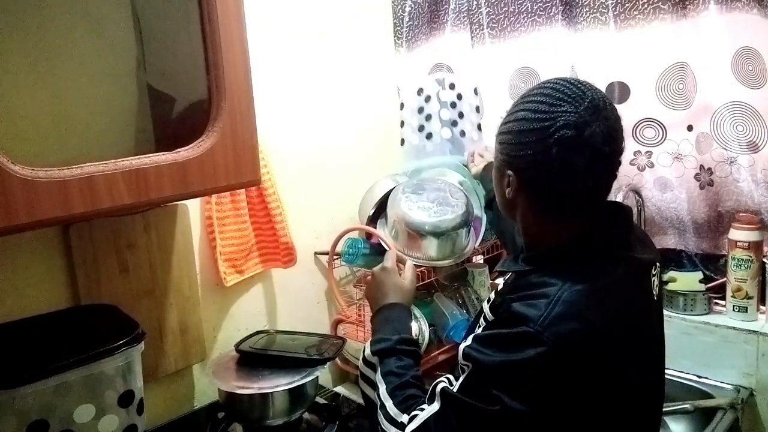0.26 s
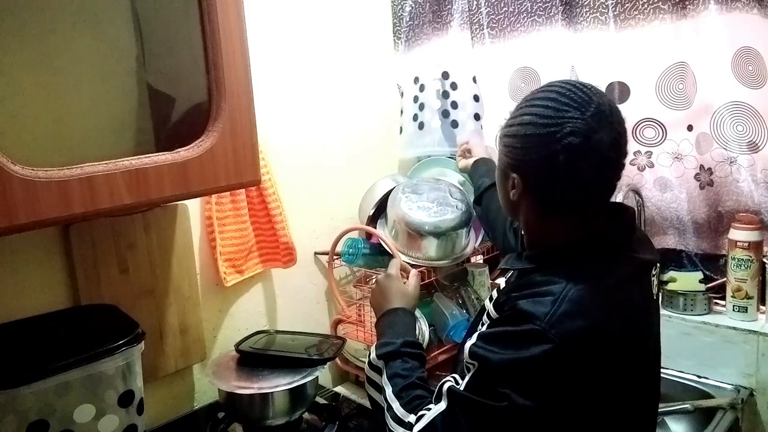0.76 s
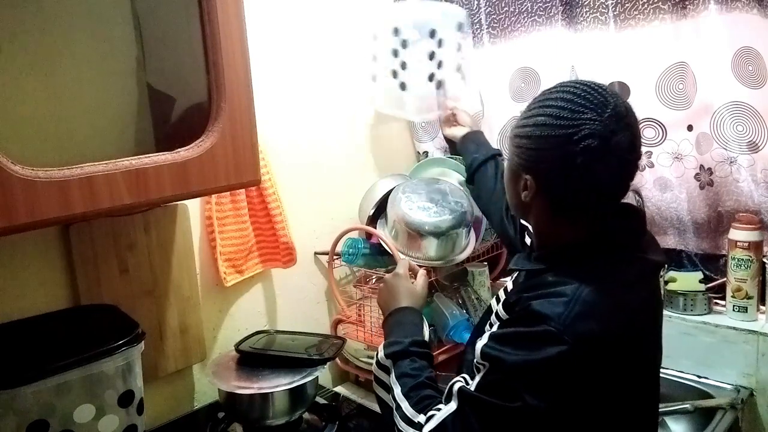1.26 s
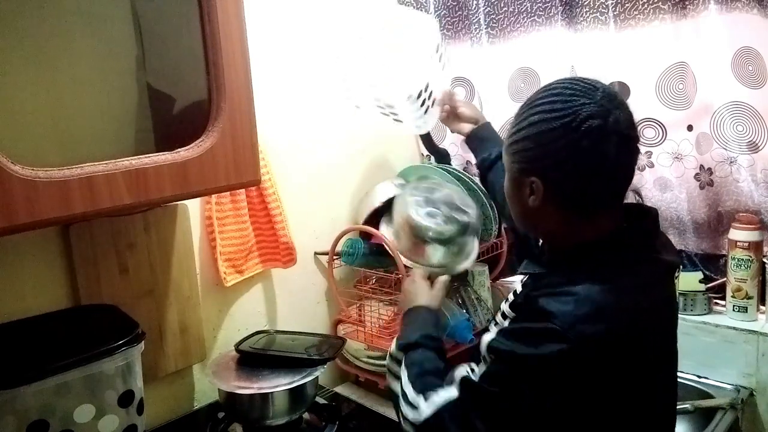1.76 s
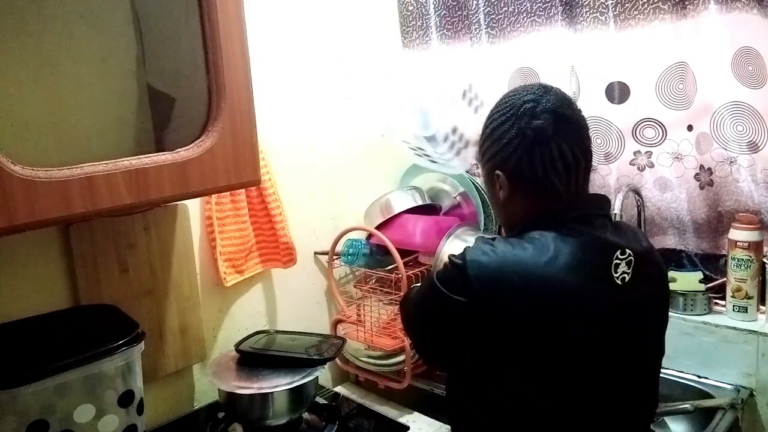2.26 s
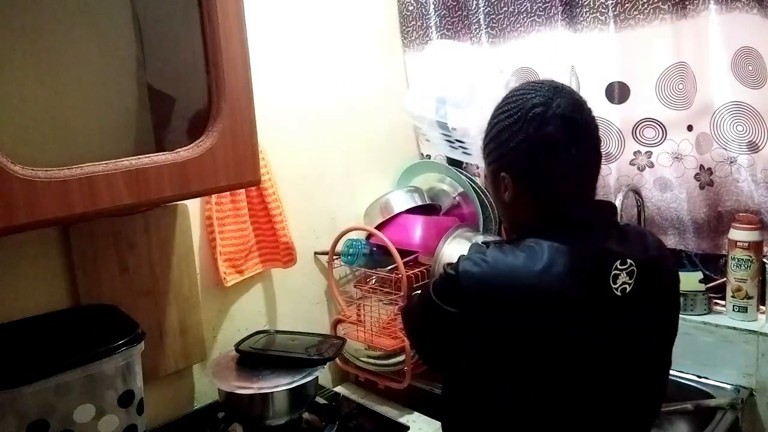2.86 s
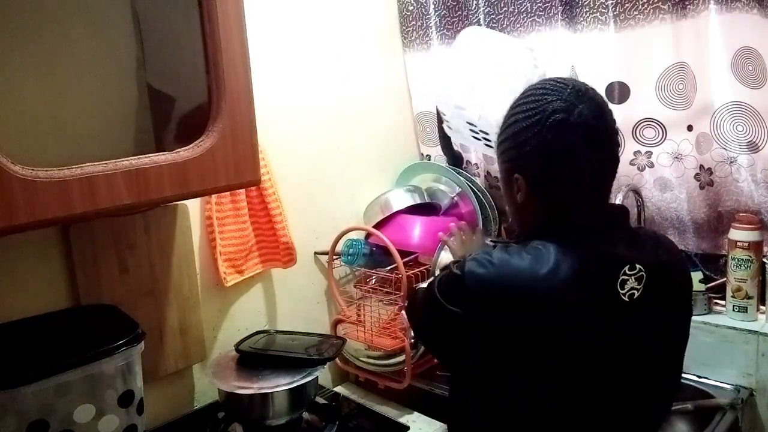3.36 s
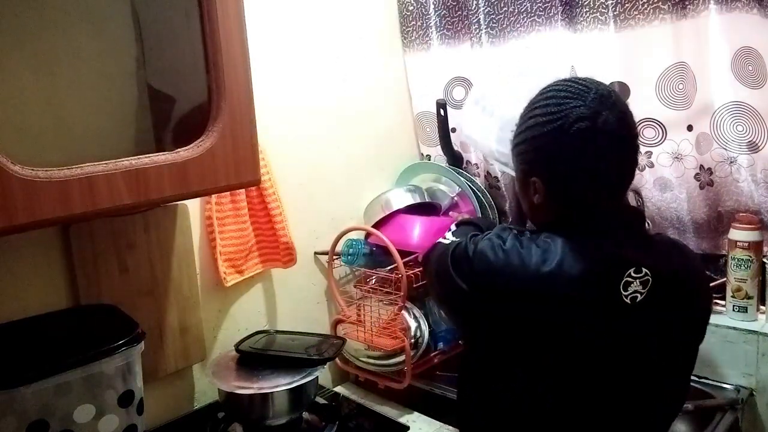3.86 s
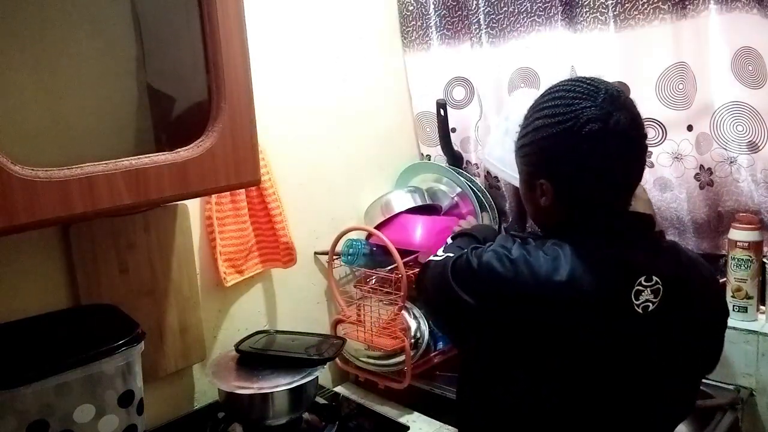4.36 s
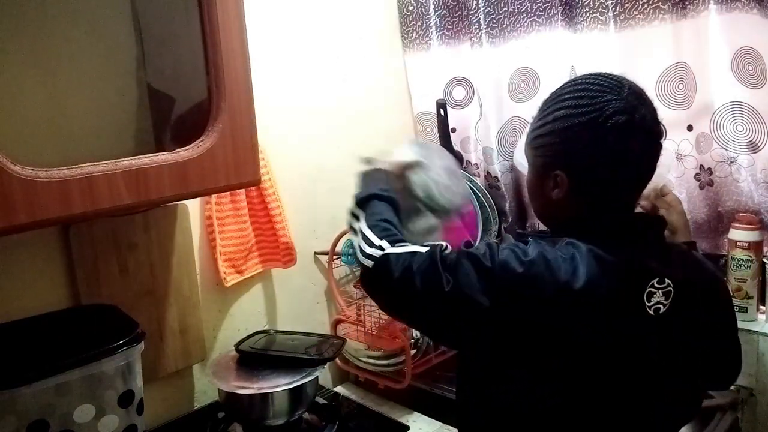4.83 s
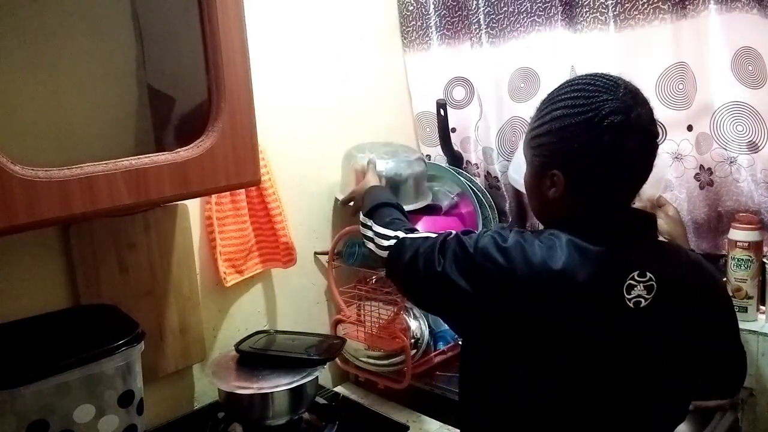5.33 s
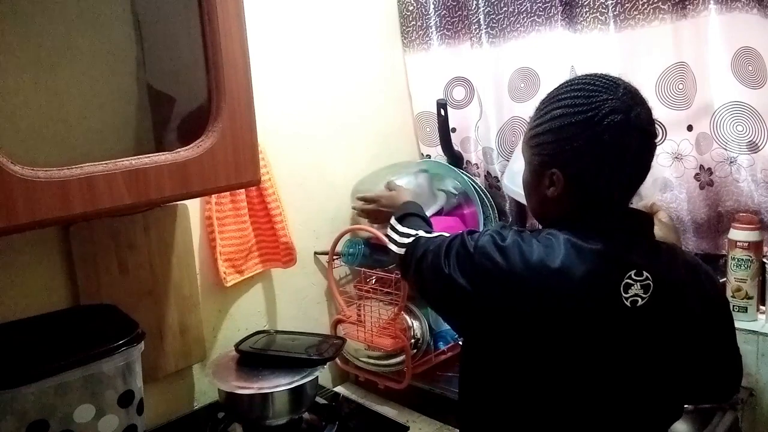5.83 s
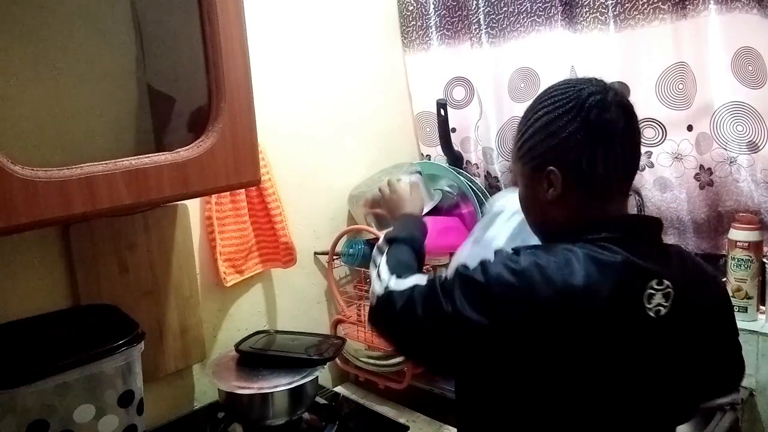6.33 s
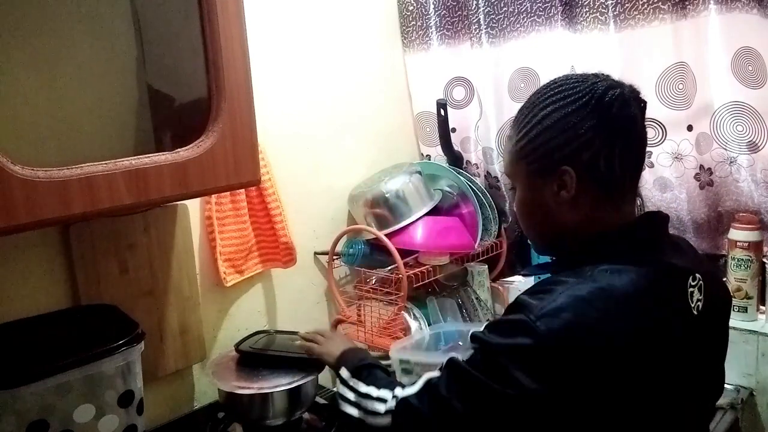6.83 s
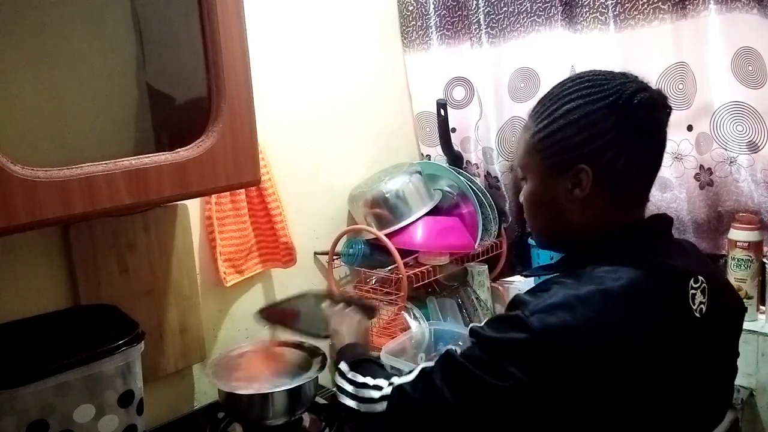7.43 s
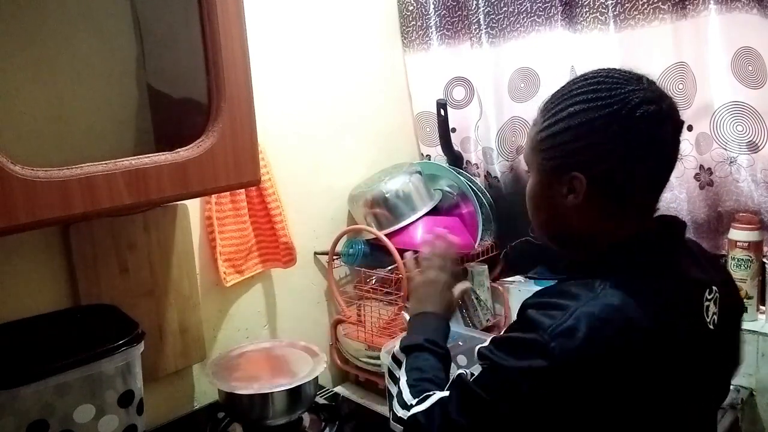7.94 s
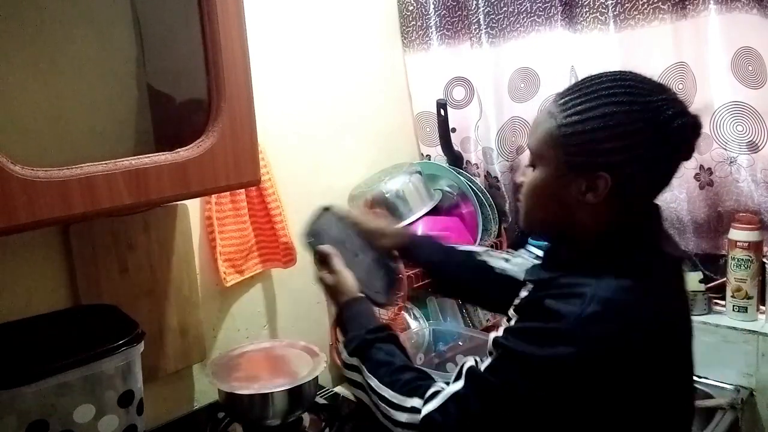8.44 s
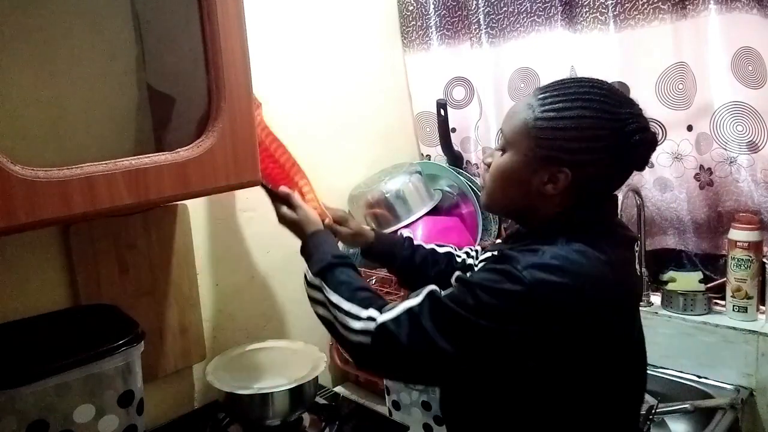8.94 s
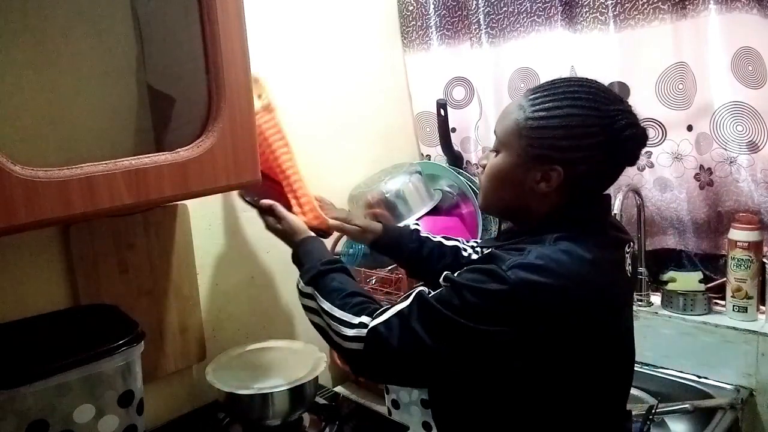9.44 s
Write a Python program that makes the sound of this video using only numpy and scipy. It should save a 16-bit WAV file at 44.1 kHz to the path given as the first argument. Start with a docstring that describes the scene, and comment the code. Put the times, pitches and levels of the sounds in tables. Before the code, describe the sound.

A plain handheld-type pickup, right side only with treble slightly dulled, catches dishes moved in a small, short-echo room. Quiet plastic bumps lead to a rattling burst from a small metal bowl, softer taps, then a large bowl's single clang and a denser clanging run that rings briefly. A plastic dish snaps down with low rack thuds, and it fades to hush and faint rustling.

```python
"""Bowls and dishes shifted and stacked in a wire rack in a small kitchen; right channel only, left silent.
Soft plastic knocks and drags up to 1.1 s; small steel bowl 1.3-3.2 s; large steel bowl 4.1-6.1 s,
ringing on; plastic again 6.4-8.0 s; then faint rustles and a drag over the hush.
Blow: filtered-noise clack, resonant knock, rack thud and decaying modes. Drag: friction noise and
noise-driven modes."""
import sys
import numpy as np
from scipy import signal
from scipy.fft import rfft, irfft
from scipy.io import wavfile
from scipy.ndimage import uniform_filter1d

SR = 44100
rng = np.random.default_rng(int(sys.argv[2]) if len(sys.argv) > 2 else 0)


def to_wav(sig):
    """Store sig (one row per channel, or 1-D mono) as 16-bit WAV at the path in sys.argv[1].

    Samples outside -1..1 are clipped; the rate is SR.
    """
    pcm = np.clip(np.atleast_2d(sig), -1, 1) * 32767
    pcm = np.round(pcm).astype(np.int16)
    wavfile.write(sys.argv[1], SR, pcm.T)  # frames by channels


N = 427632  # samples, 9.7 s

# All table levels are relative: stages downstream add gain.


def amp(db):
    """Amplitude factor of a level in dB."""
    return np.exp(np.asarray(db) * (np.log(10) / 20))


def evened(x):
    """Scales x to rms 1."""
    return x / np.sqrt(np.mean(x ** 2) + 1e-20)


def read(points, hz):
    """Interpolates (f/Hz, value) points over log frequency."""
    f, value = np.transpose(points)
    return np.interp(np.log(hz + 1), np.log(f + 1), value)


def add(mix, start_s, sound):
    """Adds sound into mix at start_s, cut at the end of mix."""
    part = mix[round(start_s * SR):][:len(sound)]
    part += sound[:len(part)]


def slow_noise(count, size):
    """Noise smoothed over size samples; rms 1."""
    return evened(uniform_filter1d(rng.standard_normal(count), size))


def swell(t, rise_s, t60_s):
    """Rounded rise, hold to 2.9 rise_s, then a fall of 60 dB in t60_s."""
    fall_db = -60 * np.maximum(t - 2.9 * rise_s, 0) / t60_s
    return np.sin(np.pi / 2 * np.minimum(t / rise_s, 1)) * amp(fall_db)


def hump(x, centre_hz, share):
    """Passes x through a steep resonance whose width is a share of its pitch; rms 1."""
    hz = np.fft.rfftfreq(len(x), 1 / SR)
    offset = (hz - centre_hz) / (share * centre_hz)
    return evened(irfft(rfft(x) / (1 + offset ** 2) ** 2, len(x)))


def ringing(modes, t):
    """Impulse response of a set of decaying modes; peak 1."""
    hz, db, t60_s = np.transpose(modes)[:, :, None]
    tones = (amp(db - 60 * t / t60_s) * np.sin(2 * np.pi * hz * t)).sum(0)
    return tones / abs(tones).max()


def shaken(modes, lumpy_db, size):
    """Modes driven by noise that comes in uneven pushes; rms 1."""
    pushes = rng.standard_normal(N) * amp(lumpy_db * slow_noise(N, size))
    return evened(signal.oaconvolve(pushes, ringing(modes, np.arange(12000) / SR))[:N])


def patchy(spectrum, size, patchy_db, frames_wide, bins_wide):
    """Noise whose short-time spectrum has drifting loud and soft patches; rms 1."""
    hz = np.fft.rfftfreq(size, 1 / SR)
    real, imag, patches = rng.standard_normal((4 * N // size + 5, len(hz), 3)).T
    patches = uniform_filter1d(uniform_filter1d(patches, bins_wide, 0), frames_wide, 1)
    level_db = read(spectrum, hz)[:, None] + patchy_db * evened(patches)
    z = (real + 1j * imag) * amp(level_db)
    return evened(signal.istft(z, nperseg=size, noverlap=3 * size // 4)[1][:N])


# Background spectrum: [f/Hz, density/dB per Hz]
HUSH_SPECTRUM = [(18, -36.5), (30, -9), (75, 9), (142, -16), (205, -0.5), (356, -20.5), (1400, -23),
                 (1520, -25.5), (5960, -24), (8180, -33), (13500, -32), (15000, -29.5), (16200, -30)]


def hush():
    """Steady background noise with drifting spectral patches."""
    return amp(-62) * patchy(HUSH_SPECTRUM, size=1024, patchy_db=4.5, frames_wide=10, bins_wide=4)


# Level of the low hum: [t/s, level/dB]
HUM_LEVEL = [(0, -50), (.25, -59.5), (2.7, -59), (3.701, -67.5), (4.601, -68), (5.3, -60.5), (6.5, -68),
             (8.15, -65), (8.4, -77.5), (9.7, -76)]
# Wire rack, first two modes the counter: [f/Hz, level/dB, t60/s]
RACK_MODES = [(72, -6, .5), (88, -6, .5), (133, -2, .35), (203, -1, .24), (241, -2, .28), (300, -5, .14),
              (375, -3, .15), (430, -4, .14)]


def rack_hum():
    """One rack mode, driven by uneven noise, hums faintly on and off."""
    level_db = np.interp(np.arange(N) / SR, *np.transpose(HUM_LEVEL))
    return amp(level_db) * shaken(RACK_MODES[4:5], lumpy_db=5.0, size=4000)


# Reverberation: [f/Hz, t60/s]
KITCHEN_T60 = [(100, 0.45), (500, .35), (1500, 0.2), (4000, 0.22), (10000, 0.16)]


def kitchen(x):
    """Sparse taps of random sign, each band dying at its own speed."""
    taps = np.zeros(SR // 2)
    at = np.arange(200, len(taps) - 20, 20)
    taps[at + rng.integers(0, 20, len(at))] = rng.choice([-1., 1.], len(at))
    hz, t, z = signal.stft(taps, SR, nperseg=256)
    fall_db = -60 * t / read(KITCHEN_T60, hz)[:, None]
    tail = signal.istft(z * amp(fall_db), SR, nperseg=256)[1]
    return signal.oaconvolve(x, tail / np.linalg.norm(tail))[:N]


# Single rubs of a finger or rim: [t/s, f/Hz, level/dB, length/s]
RUB_EVENTS = [(0.214, 996, -57, 0.18), (1.874, 5600, -28.5, .11), (2.01, 5270, -23, 0.044),
              (7.319, 1308, -50.5, 0.1), (4.139, 5200, -51, 0.18), (4.402, 4800, -44, 0.059),
              (3.431, 680, -63, 0.075), (3.558, 680, -56, 0.037), (4.86, 1900, -61.5, 0.075)]
# Faint rustles of handled dishes: [t/s, level/dB, length/s]
RUSTLE_EVENTS = [(3.389, -67.5, .07), (3.548, -66, .067), (3.617, -70.5, .08), (4.55, -67.5, .14),
                 (4.676, -67, .11), (4.889, -61.5, .09), (8.25, -71.5, .06), (8.361, -72, .08),
                 (8.931, -70, .058), (9.106, -65, 0.073), (9.258, -61.5, 0.074)]
# Pitches sounded together in each rustle: [f/Hz, level/dB]
RUSTLE_TONES = [(2350, -5.5), (3050, -1), (5300, -3)]


def rubs():
    """Noise puffs, a narrow core in a wide rustle, that swell and fade."""
    out = np.zeros(N)
    rustles = [(start_s, hz, db + tone_db, length_s)
               for start_s, db, length_s in RUSTLE_EVENTS for hz, tone_db in RUSTLE_TONES]
    for start_s, hz, db, length_s in list(RUB_EVENTS) + rustles:
        core, rustle = rng.standard_normal((2, 8192))
        puff = hump(core, hz, share=.09) + amp(-1.5) * hump(rustle, hz, share=.7)
        puff = puff[:round(length_s * SR)]
        add(out, start_s, amp(db) * puff * np.hanning(len(puff)))
    return out


# Drags: [start t/s, strongest t/s, end t/s, scrape level/dB, large-bowl hum level/dB,
#         rack rumble level/dB, counter boom level/dB]
SLIDE_EVENTS = [(0.24, 0.364, 0.98, -64, -75, -44.5, -44), (0.296, 0.499, 0.75, -55, -79.5, -62, -63),
                (0.535, .78, 1.09, -71.5, -77, -45.5, -65), (0.892, 1.099, 1.88, -46, -84.5, -45.5, -55.5),
                (1.484, 1.758, 1.83, -32, -48, -51, -57.5), (1.84, 2.052, 2.3, -23.5, -38.5, -37.5, -59.5),
                (2.294, 2.346, 2.38, -71, -82.5, -29, -36), (2.747, 2.98, 3.27, -52.5, -64.5, -42.5, -48),
                (3.22, 3.4, 3.63, -60.5, -80, -61.5, -62), (3.858, 3.92, 4.1, -68.5, -76.5, -62, -52.5),
                (4.048, 4.199, 4.5, -54, -52.5, -50, -53), (4.359, 4.406, 4.63, -48, -55, -40.5, -59),
                (5.3, 5.401, 5.75, -58.5, -43, -58, -59.5), (5.682, 5.84, 6.0, -41, -28, -41.5, -64),
                (5.902, 6.04, 6.3, -35, -30, -52, -68.5), (6.398, 6.55, 6.8, -77, -80.5, -69, -52.5),
                (6.987, 7.087, 7.27, -54, -79.5, -33, -35), (7.142, 7.278, 7.53, -45, -59, -35, -48),
                (7.548, 7.683, 8.1, -78, -83, -62.5, -52.5), (8.901, 9.205, 9.5, -77, -80, -69, -60)]
# Levels between drags: [scrape/dB, bowl hum/dB, rack rumble/dB, counter boom/dB]
STILL_LEVELS = (-77.5, -91.5, -76.5, -72)
# Friction spectrum: [f/Hz, density/dB per Hz]
SCRAPE_SPECTRUM = [(250, -11.5), (500, 5), (900, 0), (3000, -6), (5800, -7), (8200, -24), (13600, -34.5),
                   (15200, -27), (16200, -33.5)]


def sliding():
    """Friction noise that also stirs the dishes' modes; rack and counter shake with it."""
    levels = amp(STILL_LEVELS)[:, None] * np.ones(N)
    for start_s, top_s, end_s, *dbs in SLIDE_EVENTS:
        t = np.arange(start_s, end_s, 1 / SR)
        stroke_db = np.interp(t, [start_s, top_s, end_s], [-9, 0, -22.5])
        stroke = amp(stroke_db) * signal.windows.tukey(len(t), .3)
        for level, db in zip(levels, dbs):
            add(level, start_s, amp(db) * stroke)
    scrape, hum, rumble, boom = levels
    friction = patchy(SCRAPE_SPECTRUM, size=1024, patchy_db=2., frames_wide=12, bins_wide=2)
    friction += amp(-6.5) * shaken(PLASTIC_MODES, lumpy_db=3.5, size=700)
    friction *= amp(2. * slow_noise(N, size=90)) / 1.1  # rims catch and slip
    rack = shaken(RACK_MODES[2:], lumpy_db=2.5, size=2000)
    counter = shaken(RACK_MODES[:2], lumpy_db=2.5, size=3000)
    clang = patchy(CLANG_SPECTRUM, size=1024, patchy_db=4., frames_wide=16, bins_wide=2)
    bowl = shaken(LARGE_MODES, lumpy_db=4., size=400) + amp(-3.) * hump(clang, 1800., share=.9)
    return scrape * friction + hum * bowl + rumble * rack + boom * counter


# Modes that stand out as a bowl rings off: [t/s, f/Hz, level/dB, rise/s, t60/s]
SINGING_MODES = [(2.08, 695, -31, .02, .35), (2.125, 6400, -31, .012, .16), (2.25, 3730, -56, .11, 1.3),
                 (4.16, 530, -39.5, 0.014, .45), (5.35, 520, -27, .008, .3), (5.352, 848, -28, .01, .3),
                 (5.352, 1365, -33, .01, .25), (5.86, 2290, -28, .012, .3), (5.86, 3252, -29, .01, .3),
                 (6.03, 2909, -28, .015, .25), (6.03, 841, -41, .02, .4), (6.04, 3752, -44, .03, .4),
                 (6.05, 4165, -41, 0.023, .34), (6.12, 2142, -52, .035, .7), (6.1, 3320, -50, .03, .55)]


def singing():
    """Lone steel modes that outlast the clatter, fluttering as the bowl rocks."""
    out, t = np.zeros(N), np.arange(SR) / SR
    for start_s, hz, db, rise_s, t60_s in SINGING_MODES:
        flutter = amp(1.5 * slow_noise(SR, size=1200))
        tone = np.sin(2 * np.pi * hz * t + 6 * rng.random())
        add(out, start_s, amp(db) * swell(t, rise_s, t60_s) * flutter * tone)
    return out


def contact_clack(contact, t, spectrum, modes, peaky_db, rise_s, t60_s):
    """Contact noise carrying the object's many small modes; treble dies sooner than bass."""
    hz = np.fft.rfftfreq(len(t), 1 / SR)
    fine_peaks = peaky_db * slow_noise(len(hz), size=7)  # random, drawn anew for each blow
    lumps = 2.4 * slow_noise(len(hz), size=80)  # each blow favours other patches of modes
    near_modes = sum(amp(db + 3 * rng.standard_normal()) / (1 + ((hz - f) / (8 + .012 * f)) ** 2)
                     for f, db, _ in modes)
    body = contact * amp(read(spectrum, hz) + fine_peaks + lumps) * (1 + 0.92 * near_modes)
    treble = 1 / (1 + (1000.0 / (hz + 1)) ** 2)
    clack = irfft(body * (1 - treble)) * swell(t, rise_s, 1.8 * t60_s)
    clack += irfft(body * treble) * swell(t, rise_s, t60_s)
    chatter = amp(3.2 * slow_noise(len(t), size=70))  # edges bounce during contact
    return clack * chatter / np.std(irfft(body))


def hollow_knock(t, hz, rise_s, t60_s):
    """Noise through the resonance of a hollow; peak 1."""
    knock = hump(rng.standard_normal(len(t)), hz, share=0.13)
    knock *= swell(t, 0.577 * rise_s, 0.59 * t60_s)
    return knock / abs(knock).max()


def rack_thud(t, thud_hz, rise_s):
    """Rack modes driven by a noisy push, those near thud_hz strongest; built at SR/8; peak 1."""
    hz, db, t60_s = np.transpose(RACK_MODES[2:])
    near_db = db - 15. * abs(np.log2(hz / thud_hz))
    rack = ringing(np.transpose([hz, near_db, 0.3 * t60_s]), t[::8])
    push = rng.standard_normal(600) * swell(t[:4800:8], 1.3 * rise_s, 0.13)
    thud = signal.fftconvolve(rack, push / np.linalg.norm(push))[:len(rack)]
    thud = signal.resample_poly(thud, up=8, down=1)
    return thud / abs(thud).max()


def main_ring(strike, modes, t):
    """Main modes rung by the strike; each blow lands elsewhere on a dish held differently."""
    off_pitch, off_db, damped = rng.standard_normal((3, len(modes)))
    hz, db, t60_s = np.transpose(modes)
    held = np.transpose([hz * (1 + .006 * off_pitch), db + 4. * off_db,
                         t60_s * amp(-2.5 * abs(damped))])
    return signal.fftconvolve(strike / np.linalg.norm(strike), ringing(held, t))


def blows(table, spectrum, modes, peaky_db, rise_s, ring_db):
    """Each blow sums a clack, a hollow knock, a rack thud and the ring of the main modes."""
    out, t = np.zeros(N), np.arange(12288) / SR
    hz = np.fft.rfftfreq(len(t), 1 / SR)
    for start_s, db, tilt_db, t60_s, knock_db, knock_hz, thud_db, thud_hz in table:
        # each blow has its own brightness: tilt in dB per octave
        contact = rfft(rng.standard_normal(len(t))) * amp(tilt_db * np.log2((hz + 300) / 3000))
        hit = contact_clack(contact, t, spectrum, modes, peaky_db, rise_s, t60_s)
        hit += amp(knock_db + 6.5) * hollow_knock(t, knock_hz, rise_s, t60_s)
        hit += amp(thud_db + 9.5) * rack_thud(t, thud_hz, rise_s)
        add(out, start_s, amp(db - 11.5) * hit)
        strike = irfft(contact * amp(tilt_db * np.log2((hz + 300) / 1000)))  # tilted once more
        strike *= swell(t, rise_s, 0.3 * t60_s)
        add(out, start_s, amp(db + ring_db) * main_ring(strike, modes, t))
    return out


# Blow tables: [t/s, clack level/dB, brightness/dB per octave, treble t60/s,
#               knock re clack level/dB, knock f/Hz, thud re clack level/dB, thud f/Hz]
PLASTIC_BLOWS = [(.2533, -56, -2.4, 0.11, 22, 530, 29.5, 244), (.4797, -44, -5, 0.51, 6, 583, 13.5, 332),
                 (.5991, -52, -5.5, .14, 8.5, 412, 19.5, 218), (.9168, -45.5, 2.2, 0.29, -15, 810, 1, 241),
                 (1.0556, -39, 3, 0.17, -8, 520, -1, 140.1), (3.54, -57, -2, .12, 14, 611, 8, 238.7),
                 (3.8857, -41.5, 1.6, .15, -6, 1087, 4, 130), (6.4306, -59, -3, 0.12, 15.5, 495.5, 19, 258),
                 (6.9985, -28, -4, 0.11, -9, 1122, 11.5, 185.7),
                 (7.084, -33, -6.5, .07, 6.5, 446, 2.5, 300), (7.1, -33, -11, 0.039, 23.5, 394, 7.5, 300),
                 (7.1226, -33, -14, 0.047, 19.5, 425, 2, 293),
                 (7.2045, -15.5, -1, 0.055, -4.5, 3000, -2, 201.8),
                 (7.7807, -42.5, -2.5, 0.12, 2, 735, 9.5, 203),
                 (8.0375, -55, -2, 0.22, 16.5, 748, 6, 247.5)]
# Plastic dish: [f/Hz, level/dB, t60/s]
PLASTIC_MODES = [(1150, -4, .07), (1350, -4, .07), (1750, -5, .07), (2060, -3, .09), (2310, -1, .07),
                 (2800, 0, .06), (3050, -2, .06), (5000, -3, .04), (5400, -4, .04), (5800, -5, .04)]
# Clack of plastic and small bowl: [f/Hz, density/dB per Hz]
CLACK_SPECTRUM = [(350, -21), (600, -12), (933, -10.5), (2450, -11.5), (4200, -12), (5300, -14.5),
                  (6500, -14.5), (8250, -28.5), (13600, -33), (15200, -22.5), (16200, -35)]


def plastic_dishes():
    """Plastic blows: short-lived modes, mostly soft."""
    return blows(PLASTIC_BLOWS, CLACK_SPECTRUM, PLASTIC_MODES, peaky_db=4.5, rise_s=.005, ring_db=-5.5)


# Blows, columns as for plastic
SMALL_BLOWS = [(1.3465, -15, -4, 0.18, -11, 890, 5, 298), (1.532, -3.5, 0.5, 0.16, -16, 3000, -18, 260),
               (1.655, -14, 0, 0.15, -7.5, 1320, -6.5, 370), (1.672, -12, 0, 0.19, -4, 1980, -13, 370),
               (1.697, -20.5, -3.5, 0.13, 1, 556, -1.5, 364), (1.7192, -24, -1, 0.029, -2, 564, -19, 363),
               (1.7794, -21.5, 1.5, 0.26, -11, 584, -6, 342), (1.818, -24.5, -1.5, 0.15, 4, 602, 0.5, 420),
               (1.8845, -12, 1.3, 0.33, 0, 515, -4.5, 376.3), (1.9506, -11.5, 2.7, 0.12, -4, 485, -11, 357),
               (1.985, -17, -2, 0.48, 4.5, 770, -1.5, 370), (2.0236, -9.5, 2, 0.14, -1.5, 646, -9.5, 198),
               (2.073, -10, 1.1, 0.37, 3.5, 685, -9, 203), (2.139, -13, -1, 0.26, -6, 490, -4.5, 132),
               (2.3175, -29.5, -0.5, 0.073, -16, 470, 10, 358), (2.389, -30, -6, 0.2, 2, 375, 7.5, 132),
               (2.4329, -23, 0.8, 0.099, -30.5, 1330, -3, 132.5),
               (2.9052, -31.5, -0.8, 0.63, -13, 1465, -5, 253), (3.037, -33.5, -5, 0.13, -9, 796, -33, 126),
               (3.1118, -17, -0.1, 0.14, -7.5, 1150, -9.5, 398),
               (3.2268, -29.5, -4.5, 0.095, 9, 386, 10, 212)]
# Small steel bowl: [f/Hz, level/dB, t60/s]
SMALL_MODES = [(695, -2, .15), (1077, -6, .15), (1669, -6, .18), (1916, -6, .15), (2169, -4, .13),
               (2972, -8, .18), (4290, -7, .13), (4781, -7, .16), (5200, -4, .1), (5905, -9, .15),
               (6412, -8, .15)]


def small_bowl():
    """Small steel bowl: clack with a weaker ring of its modes."""
    return blows(SMALL_BLOWS, CLACK_SPECTRUM, SMALL_MODES, peaky_db=2.0, rise_s=.005, ring_db=-14.5)


# Blows, columns as for plastic
LARGE_BLOWS = [(4.0726, -33, 0.5, 0.096, -2, 1040, -5.5, 232),
               (4.141, -27.5, 2.5, 0.11, -9, 570, -3.5, 203.7),
               (4.163, -35.5, -5, .15, 12, 640, 6.5, 230.4),
               (4.2007, -27.5, 0.8, 0.098, -3.1, 517, -21.5, 198),
               (4.412, -22.5, 3, 0.1, -7.5, 530.4, -7, 349.4), (5.347, -9, -3.5, 0.12, -2.6, 779, -15, 368),
               (5.5977, -43, 6, 0.36, -11.5, 700, -12, 241.8),
               (5.683, -34, -4, 0.34, 6.5, 1140, 4.5, 349.7),
               (5.709, -27, -14, 0.16, -0.5, 1340, -7.5, 372.7),
               (5.7344, -20, -5, 0.35, 1, 1174, -4, 370.3), (5.7603, -15, -9.5, 0.59, 1.5, 800, -5, 377.7),
               (5.790, -4.5, 0.5, 0.14, -6, 533, -25, 379), (5.853, -5, -0.84, 0.069, -13.5, 503, -18, 379),
               (5.884, -16, 0, 0.098, 6.5, 2300, -19, 379), (5.912, -14, -2, 0.36, 3.5, 2300, -19, 379),
               (5.992, -6, -0.6, 0.13, -14, 1129, -21, 369),
               (6.0212, -7.5, 1.6, 0.11, -17.5, 484, -30.5, 374.3),
               (6.062, -23, -0.5, 0.16, 11, 3760, -17.5, 369)]
# Large steel bowl: [f/Hz, level/dB, t60/s]
LARGE_MODES = [(375, 0, .2), (534, -4, .25), (576, -4, .25), (848, -5, .18), (1155, -8, .18),
               (1370, -6, .16), (1823, -6, .18), (2014, -5, .22), (2248, -5, .18), (2287, -1, .18),
               (2352, -2, .2), (2676, -8, .25), (2934, -4, .17), (3253, -4, .3), (3451, -10, .2),
               (3752, -12, .2), (4167, -13, .2), (4760, -8, .18), (5335, -12, .15), (5846, -10, .16),
               (6751, -14, .2)]
# Clang of the large bowl: [f/Hz, density/dB per Hz]
CLANG_SPECTRUM = [(120, -49.5), (350, -33), (700, -8.5), (1300, -11.5), (2320, -6.5), (3300, -7.5),
                  (3800, -19.5), (4500, -14.5), (5000, -9.5), (6600, -14), (8500, -25.5), (13600, -33.5),
                  (15200, -25.5), (16200, -27)]


def large_bowl():
    """Large steel bowl: many strong modes, lowest near 375 Hz."""
    return blows(LARGE_BLOWS, CLANG_SPECTRUM, LARGE_MODES, peaky_db=4.0, rise_s=.0044, ring_db=-3.5)


def scene():
    """Blows and rubs with reverberation, plus drags, singing modes and background; right only."""
    hits = small_bowl() + large_bowl() + plastic_dishes() + rubs()
    no_bass = signal.butter(8, 118., "high", fs=SR, output="sos")  # dishes radiate no deep bass
    hits = signal.sosfilt(no_bass, hits)
    heard = hits + amp(-4.5) * kitchen(hits) + sliding() + singing() + hush() + rack_hum()
    return np.array([np.zeros(N), 2 * heard])


def record(dry):
    """Noise suppressor lowers bands near their quiet level by up to 2 dB; bass cut, soft clip, low-pass."""
    z = signal.stft(dry[1], nperseg=512, noverlap=384)[2]
    power = uniform_filter1d(uniform_filter1d(abs(z) ** 2, 5, 0), 6, 1) + 1e-20
    quiet = np.percentile(power[:, ::4], 20, axis=1, keepdims=True)
    gain = np.maximum(1 - 8.7 * quiet / power, amp(-2.0))
    kept = signal.istft(z * gain, nperseg=512, noverlap=384)[1][:N]
    kept = signal.sosfilt(signal.butter(4, 60., "high", fs=SR, output="sos"), kept)
    clipped = np.tanh(kept * .88) / .86
    low_pass = signal.firwin(511, 16250, window=("kaiser", 9), fs=SR)
    right = signal.oaconvolve(clipped, low_pass, "same")
    return np.array([np.zeros(N), right])


dry = scene()
out = record(dry)
to_wav(out)
```